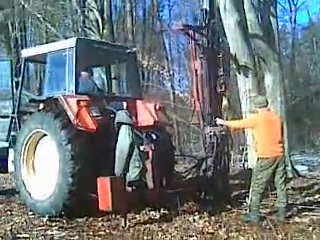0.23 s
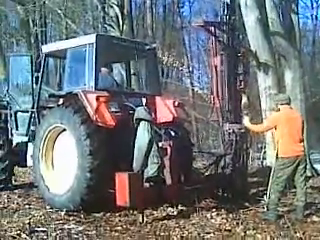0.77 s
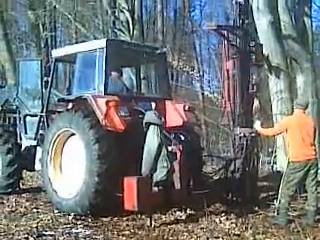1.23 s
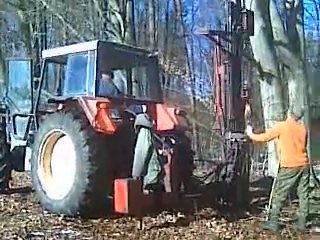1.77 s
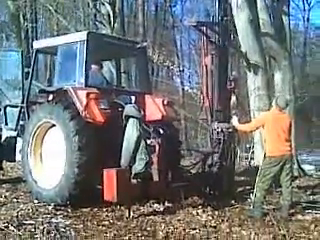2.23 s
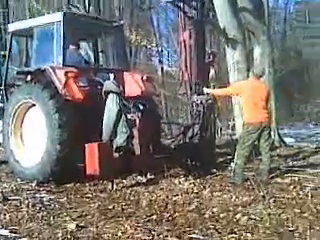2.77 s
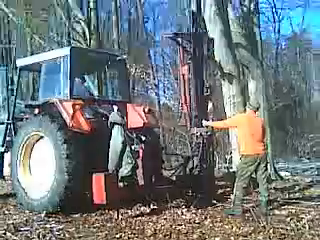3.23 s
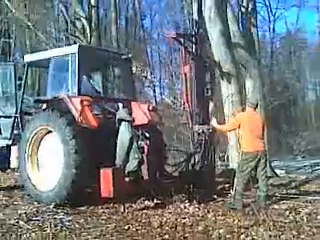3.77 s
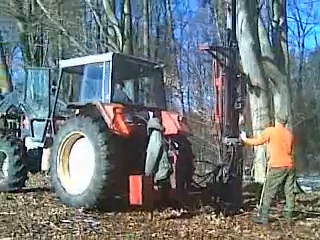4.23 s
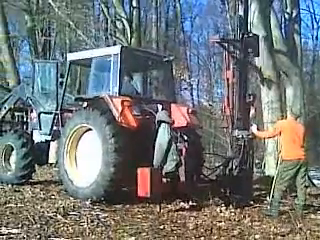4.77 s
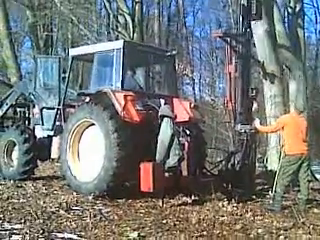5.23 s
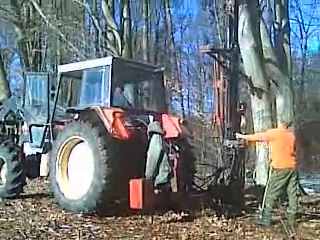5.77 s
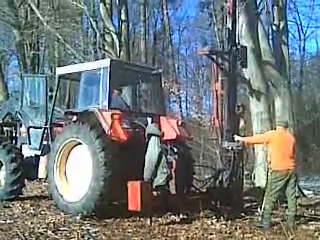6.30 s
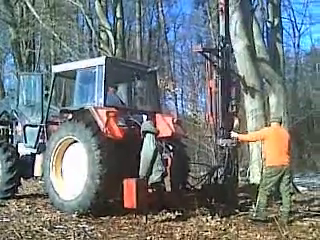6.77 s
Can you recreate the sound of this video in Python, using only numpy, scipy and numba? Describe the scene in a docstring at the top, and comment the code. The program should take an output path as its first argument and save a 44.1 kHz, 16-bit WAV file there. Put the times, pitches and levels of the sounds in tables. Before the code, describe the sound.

Outdoors in a bare wood, a tractor diesel drones and clatters continuously. A steel ram drops three times, about three seconds apart, each blow a harsh metallic crash with a deep thud and a clattering rebound. Between blows the engine takes load, with faint pump whine, chain ticks, light clanks and crunching leaves. The small microphone some metres away distorts on the impacts and briefly ducks the engine.

```python
"""In a leafless wood, a tractor-mounted post driver works some metres from a small microphone.
The steel ram drops on a stake, rebounds and rattles in its mast: noise bursts and decaying tones.
Then the six-cylinder diesel, a stack of tones plus noisy clatter, takes the load and hoists it again.
A hoist chain, light clanks, dry leaves and one tap are heard between the blows.
The blows overload the input, and the gain control ducks the engine for a moment."""
import sys
import numpy as np
from scipy import signal
from scipy.fft import rfft, irfft
from scipy.io import wavfile
from scipy.ndimage import uniform_filter1d
from numba import njit

SR = 44100
rng = np.random.default_rng(int(sys.argv[2]) if len(sys.argv) > 2 else 0)


def pcm_store(signal):
    """Save signal as 16-bit PCM."""
    levels = np.round(np.clip(np.atleast_2d(signal), -1, 1) * 32767)
    wavfile.write(sys.argv[1], SR, levels.astype(np.int16).T)


N = 309582  # length in samples

# Tone of the dense, short-lived crash of the steel mast, between its clear ringing tones.
# Each row: frequency in Hz, relative level in dB per Hz.
CRASH_TONE = [(40, -13), (200, -8), (380, 1), (520, -1.5), (700, 0.5), (1300, -2), (1800, -3), (2100, -4.5),
              (2550, -4), (3400, -8.5), (4700, -14.5), (6200, -10), (7200, -17)]


def undb(db):
    """Turn decibels into a gain factor."""
    return 10 ** (np.asarray(db) / 20)


def unit(x):
    """Scale a sound to an rms level of 1."""
    return x / np.sqrt(np.mean(x ** 2))


def add(track, start_s, sound):
    """Mix a sound into a track from a start time on."""
    part = track[int(start_s * SR):][:len(sound)]
    part += sound[:len(part)]


def colour(x, points):
    """Filter with a (Hz, dB) shape that only looks back in time; keeps the power of white noise."""
    size = 4096
    hz, db = np.transpose(points)
    f = np.maximum(np.arange(size // 2 + 1) * SR / size, 1)
    shape = undb(np.interp(np.log(f), np.log(hz), db))
    # folding the cepstrum forward in time gives the minimum-phase response
    cepstrum = irfft(np.log(shape))
    cepstrum[1:size // 2] *= 2
    cepstrum[size // 2 + 1:] = 0
    response = irfft(np.exp(rfft(cepstrum)))
    return signal.fftconvolve(x, response / np.linalg.norm(response))[:len(x)]


def walk(rate):
    """Slow random wander of rms 1: levels held for 1 / rate seconds, then smoothed twice."""
    k = int(SR / rate)
    steps = np.repeat(rng.standard_normal(N // k + 1), k)
    smooth = uniform_filter1d(uniform_filter1d(steps, k), k)
    return unit(smooth[:N])


def fade(t, t60):
    """Exponential decay by 60 dB in t60 seconds."""
    return np.exp(-np.log(1000) * t / t60)


def ring(modes, t, scatter_db, detune):
    """Decaying tones of struck metal; each contact weights and detunes them a little differently."""
    out = np.zeros(len(t))
    for hz, db, t60 in modes:
        level, pitch, phase = rng.standard_normal(3)
        tone = np.sin(2 * np.pi * (hz * (1 + detune * pitch) * t + phase))
        out += undb(db + scatter_db * level) * fade(t, t60) * tone
    return out


def effort():
    """Load 0-1 and firing rate: each lift slows the engine, and the governor wins most of it back."""
    # The hoist lifts the ram. Each row: start in seconds, end in seconds (where the load begins to go).
    hoists = [(1.26, 2.82), (4.41, 5.96)]
    valve_s, idle_load = .21, 0.094  # time for the load to come or go; share left between lifts
    free_hz, droop_hz = 65.33, .5  # firing rate running free; its lasting drop during a lift
    sag_hz, governor_s = 1.3, .2  # further pull on the rate until the governor catches up
    t = np.arange(N) / SR
    lifting = np.zeros(N)
    for start, end in hoists:
        lifting += np.clip((t - start) / valve_s, 0, 1) - np.clip((t - end) / valve_s, 0, 1)
    step = 1 / (governor_s * SR)
    fuel = signal.lfilter([step], [1, step - 1], lifting)  # follows the load late
    load = np.clip(idle_load + (1 - idle_load) * lifting, 0, 1)
    return load, free_hz - droop_hz * lifting - sag_hz * (lifting - fuel)


def ground(x, reflect=0.35):
    """A late copy from the ground cuts shallow notches, which shift as the microphone moves."""
    # Path of the ground echo. Each row: time in seconds, delay of the echo in milliseconds.
    echo_path = [(0, 0.93), (2.7, 0.94), (3.05, 1.33), (3.6, 1.24), (4.5, 1.13), (7.02, 1.046)]
    i = np.arange(N)
    lag = np.interp(i / SR, *np.transpose(echo_path)) * SR / 1000
    return x + reflect * np.interp(i - lag, i, x)


def edge(x):
    """Lift or lower the band around the clatter's upper edge, duller once the microphone has moved."""
    # Level of that band. Each row: time in seconds, gain at the band's centre in dB.
    edge_level = [(2.75, 2.5), (3.05, -2.5)]
    edge_hz = 2150
    gain = undb(np.interp(np.arange(N) / SR, *np.transpose(edge_level)))
    return x + (gain - 1) * signal.lfilter(*signal.iirpeak(edge_hz, 4, fs=SR), x)


def diesel():
    """Six firings a cycle: an even drone under load, a once-a-cycle throb running free, and clatter."""
    # Exhaust and intake tones. Each row: multiple of the working cycle,
    # relative level in dB running free, relative level in dB under full load.
    orders = [(5, -45, -50), (6, -32, -26.5), (7, -49.5, -48.5), (8, -39, -43.5), (10, -50, -63),
              (12, -39.5, -36.5), (14, -52, -59), (15, -38.5, -57.5), (16, -30.5, -35), (17, -43.5, -52.5),
              (18, -36.5, -32.5), (19, -38, -50), (20, -46, -60.5), (21, -54.5, -51.5), (22, -39.5, -45.5),
              (23, -56.5, -66.5), (24, -47, -41), (25, -46, -53.5), (26, -48, -40.5), (27, -59, -45.5),
              (28, -56, -58), (32, -55.5, -61), (34, -50.5, -55), (40, -56, -57)]
    # Geared hydraulic pump, singing under load. Each row: multiple of the working cycle,
    # relative level in dB running free, relative level in dB under full load.
    whine = [(66.54, -60, -40), (89.4, -59, -41)]
    # Combustion clatter of the block. Each row: frequency in Hz, relative level in dB per Hz.
    block = [(60, -11), (150, 2), (280, 1.5), (420, -0.5), (560, -9.5), (640, -6.5), (710, -3), (830, -3.5),
             (970, -1.5), (1130, -1), (1350, -5.5), (1750, -9.5), (2200, -15), (2800, -23.5), (4500, -27.5)]
    # Steady rush of fan and hydraulics. Each row: frequency in Hz, relative level in dB per Hz.
    rush_tone = [(30, -0.5), (300, 0), (1000, 6.5), (3400, 3.5), (4600, 2.5), (6000, 6), (7000, -4.5)]
    cylinders = 6
    engine_db = .5
    load, firing_hz = effort()
    uneven_hz = firing_hz * (1 + .0015 * walk(14))
    cycle = .8 + np.cumsum(uneven_hz) / SR / cylinders  # working cycles so far

    drone = np.zeros(N)
    for order, free_db, load_db in orders:
        lag = order ** 2 / 70  # the pipes smear each pulse in time
        level = undb(free_db + load * (load_db - free_db) + 1.45 * walk(10))
        drone += level * np.cos(2 * np.pi * (order * cycle - lag))
    for multiple, free_db, load_db in whine:
        level = undb(free_db + load * (load_db - free_db) + 1.8 * walk(17))
        drone += level * np.sin(2 * np.pi * multiple * cycle)

    # every firing knocks the block, each with its own strength
    firings = cycle * cylinders
    strength_db = rng.standard_normal(N // 100)[firings.astype(int)]
    knock = unit(undb(strength_db) * (1 + 0.46 * np.exp(-(firings % 1) / 0.23)))
    # most of the clatter comes back alike in every working cycle
    turn = rng.standard_normal(int(SR * cylinders / firing_hz.mean()))
    repeated = turn[((cycle % 1) * len(turn)).astype(int)]
    grain = unit(rng.standard_normal(N) + 1.4 * repeated)
    clatter = edge(ground(colour(knock * grain, block)))
    clatter = clatter * undb(-32 + 1.28 * load + 0.18 * walk(13))

    rush = undb(-45.0 + 1.5 * walk(2.7)) * colour(rng.standard_normal(N), rush_tone)
    engine = undb(-3.0) * np.sqrt(2) * drone + clatter
    return undb(engine_db - 1.4 * load) * engine + rush


def leaves():
    """Dry leaves crunch: dense tiny snaps that swell and die away."""
    # Crunches. Each row: start in seconds, relative level in dB, time constant of the decay in seconds.
    crunches = [(1.144, -23.5, 0.021), (1.171, -27.5, 0.068), (4.309, -21.5, 0.011), (4.343, -31, 0.041)]
    # Tone of the leaf litter. Each row: frequency in Hz, relative level in dB per Hz.
    litter = [(800, -20), (2500, 3.5), (4200, -3), (5600, 2.5), (7000, 0)]
    out, t = np.zeros(N), np.arange(SR // 3) / SR
    for start, db, length in crunches:
        snaps = unit(rng.standard_normal(len(t)) * undb(2 * rng.exponential(size=len(t))))
        swell = 1 - np.exp(-t / 0.0023)
        add(out, start, undb(db) * snaps * np.exp(-t / length) * swell)
    return colour(out, litter)


def tap():
    """One dry tap close to the microphone: a heavily damped push with no lasting ring."""
    start_s, db = 2.8076, -8.5  # level before the treble is softened
    out, t = np.zeros(N), np.arange(SR // 50) / SR
    add(out, start_s, undb(db) * np.cos(2 * np.pi * 500 * t) * fade(t, 0.0051))
    return signal.sosfilt(signal.butter(1, 4500, fs=SR, output="sos"), out)


def chain():
    """Links tick over the sheave one after another, unevenly, and each jolts the mast a little."""
    # Runs of the hoist chain. Each row: start in seconds, end in seconds, relative level in dB.
    runs = [(1.383, 1.7, -37.5), (4.43, 4.8, -41)]
    # Ringing tones of a link. Each row: frequency in Hz, relative level in dB, 60 dB decay in seconds.
    link_modes = [(2545, 5.5, 0.11), (2600, -2, 0.067), (3430, -13.5, 0.037), (4110, -4.5, 0.062),
                  (5870, -18, .04)]
    link_s = .044  # average time from one link to the next
    out, t = np.zeros(N), np.arange(SR // 5) / SR
    for start, end, db in runs:
        for s in np.arange(start, end, link_s):
            scrape = rng.standard_normal(len(t)) * np.exp(-t / 0.0099)
            modes = ring(link_modes, t, scatter_db=0.5, detune=0.0086)
            # the scrape sets the link ringing
            link = signal.fftconvolve(scrape / np.linalg.norm(scrape), modes)[:len(t)]
            jolt = undb(5.5) * colour(scrape, CRASH_TONE)
            level = undb(db + 2 * rng.standard_normal())
            add(out, s + 0.004 * rng.standard_normal(), level * (link + jolt))
    return out


def steel(db, chatter, favoured_hz, weight_db):
    """Steel on steel: a burst of chatter, a dense crash that dies fast, and the ringing mast."""
    # Ringing tones of mast and ram. Each row: frequency in Hz, relative level in dB,
    # 60 dB decay in seconds before the damping below.
    mast = [(267.7, -1.5, 0.96), (406, -5, 0.21), (576, -6, 0.73), (694, 6.5, 0.071), (818, -6, 0.14),
            (977, 2, 0.44), (1120, -7.5, .2), (1328, -2, .2), (1465, -2.5, 0.18), (1500, -1, 0.18),
            (1720, 1, 0.12), (1826, -1, 0.19), (2030, -10, 0.22), (2374, -1.5, 0.24), (2450, 0.5, 0.26),
            (2566, -2.5, 0.65), (2690, -17, 0.34), (3346, -5.5, 0.32), (3834, -6, 0.22),
            (4850, -16.5, 0.22), (5480, -11.5, 0.32), (6000, -13, .25), (6400, -21, .25)]
    t = np.arange(int(.6 * SR)) / SR
    contact = np.exp(-t / chatter)
    # loose parts keep rattling unevenly, longer after a long blow
    rattle = undb(3.7 * walk(300)[:len(t)]) * 0.22 * fade(t, 26 * chatter)
    crash = colour(rng.standard_normal(len(t)) * (contact + rattle), CRASH_TONE)
    # the modes swing widest while the parts still chatter; the resting ram then damps them
    modes = ring(mast, t, scatter_db=1.0, detune=.002) * (1 + 2 * contact)
    onset = 1 - np.exp(-t / 0.00097)
    hit = (crash + undb(-19) * modes * fade(t, 0.94)) * onset
    # the place that is struck favours one resonance
    favoured = signal.lfilter(*signal.iirpeak(favoured_hz, 6.5, fs=SR), hit)
    hit = hit + undb(weight_db) * favoured
    # contact starts soft, so the treble arrives a moment after the body
    body = signal.sosfilt(signal.butter(1, 1500, fs=SR, output="sos"), hit)
    treble = hit - body
    return undb(db) * (hit - np.exp(-t / (0.33 * chatter)) * treble)


def clanks():
    """Slack hoist gear knocks lightly on the mast, mostly as it takes the weight."""
    # Knocks. Each row: start in seconds, relative level in dB, time constant of the chatter in seconds.
    knocks = [(1.266, -26, 0.0067), (1.351, -25.5, .0025), (1.421, -27.5, 0.0054), (1.603, -24, 0.01),
              (4.222, -34, 0.0087), (4.43, -23, 0.0045), (4.585, -22, 0.0029), (4.781, -28.5, 0.018)]
    out = np.zeros(N)
    for start, db, chatter in knocks:
        add(out, start, steel(db, chatter, favoured_hz=1790, weight_db=4.5))
    return out


def thud(db):
    """Stake and ground take the blow with a short, deep thump."""
    # Tone of the ground. Each row: frequency in Hz, relative level in dB per Hz.
    soil = [(18, -14), (35, 0), (65, 3.5), (110, -2.5), (200, -10.5), (350, -13), (700, -23), (3000, -50)]
    t = np.arange(SR // 2) / SR
    push = fade(t, .13) * (1 - np.exp(-t / 0.0021))
    return undb(db) * colour(rng.standard_normal(len(t)) * push, soil)


def ram():
    """Each drop: a graze on the way down, strike and thud, a jolt of the mast, a rebound, a last hop."""
    # Drops of the ram. Each row: strike time in seconds, relative level in dB, gap between contacts in
    # seconds, stake resonance in Hz, steel resonance in Hz, relative thud level in dB, relative level
    # of the mast jolt in dB, time from rebound landing to last hop in seconds.
    strikes = [(.437, -8, .012, 435, 1240, -7.5, -24.5, .039),
               (3.644, -5.5, 0.014, 680, 1680, -4.5, -35, .048),
               (6.831, -6, .022, 716, 1850, -3, -21.5, .045)]
    # One landing hits cap, stake and guide in turn. Each row: delay in gaps, level against the strike
    # in dB, time constant of the chatter in gaps.
    contacts = [(0, -1, 0.96), (1, 2, 0.82), (2.4, -3, 1.0)]
    stake_weight_db, steel_weight_db = 5.5, 0.5  # pull of the resonance: first contact, later ones
    slide_lead_s, slide_db = .088, -23  # the falling ram grazes its guide before each strike
    soil_lag_s, jolt_s = .005, .105  # after the strike: the stake moves, the mast rocks back
    rebound_s, rebound_db, rebound_gap_s = .2315, -4.5, .007  # the ram bounces and lands again
    hop_db = -7.5  # then it hops once more and rests
    out = np.zeros(N)
    for s, db, gap, stake_hz, steel_hz, thud_db, jolt_db, hop in strikes:
        add(out, s - slide_lead_s, steel(db + slide_db, 0.013, 690, weight_db=11))
        for k, (delay, contact_db, chatter) in enumerate(contacts):
            if k == 0:
                hz, weight_db = stake_hz, stake_weight_db
            else:
                hz, weight_db = steel_hz, steel_weight_db
            add(out, s + delay * gap, steel(db + contact_db, chatter * gap, hz, weight_db))
        add(out, s + soil_lag_s, thud(thud_db))
        add(out, s + jolt_s, steel(jolt_db, 0.013, 1240, weight_db=16))
        again = s + rebound_s
        add(out, again, steel(db + rebound_db, 0.01, stake_hz, weight_db=10.5))
        add(out, again + rebound_gap_s, steel(db + rebound_db - 3.5, .0075, steel_hz, weight_db=9))
        add(out, again + hop, steel(db + hop_db, 0.013, 1210, weight_db=5))
    return out


def forest(x, t60, wet_db):
    """Tree trunks scatter a thin, dull echo: decaying noise with a soft start."""
    t = np.arange(SR) / SR
    echoes = rng.standard_normal(SR) * fade(t, t60) * (1 - np.exp(-t / 0.026))
    echoes = colour(echoes, [(150, -1.0), (900, -7.0), (2500, -5.5), (7000, -7.5)])
    return x + undb(wet_db) * signal.fftconvolve(x, echoes / np.linalg.norm(echoes))[:N]


def scene():
    """Engine, small sounds and post driver at one microphone."""
    driver = forest(ram() + clanks() + chain(), t60=0.45, wet_db=-13)
    return (diesel() + leaves() + tap() + driver)[None]


@njit
def follow(x, attack, release):
    """Envelope that rises fast and sinks slowly."""
    out, e = np.empty(len(x)), 0.
    for i in range(len(x)):
        e += (x[i] - e) * (attack if x[i] > e else release)
        out[i] = e
    return out


def record(dry, threshold_db=-22, attack_s=0.086, release_s=0.59, ratio=2.1):
    """Gain control ducks after loud blows, peaks are clipped, and the top is cut."""
    top_hz = 7100
    envelope = follow(np.abs(dry[0]), 1 / (attack_s * SR), 1 / (release_s * SR))
    gain = np.maximum(envelope / undb(threshold_db), 1) ** (1 / ratio - 1)
    clipped = np.clip(dry * gain, -.7, .7)
    return signal.sosfilt(signal.ellip(10, .3, 75, top_hz, fs=SR, output="sos"), clipped)


dry = scene()
out = record(dry)
pcm_store(out)
```